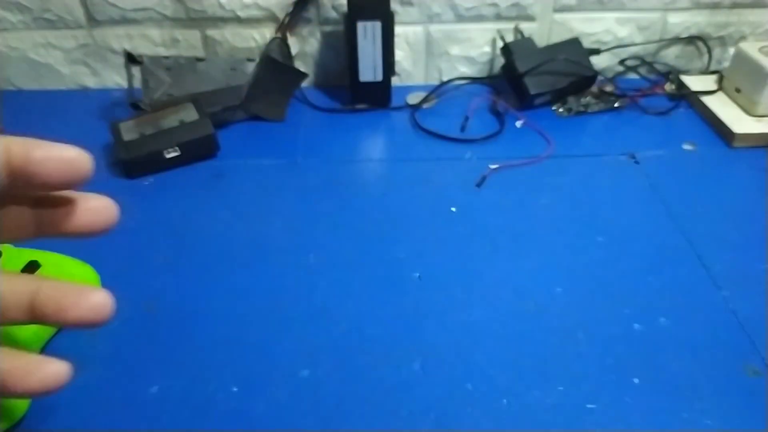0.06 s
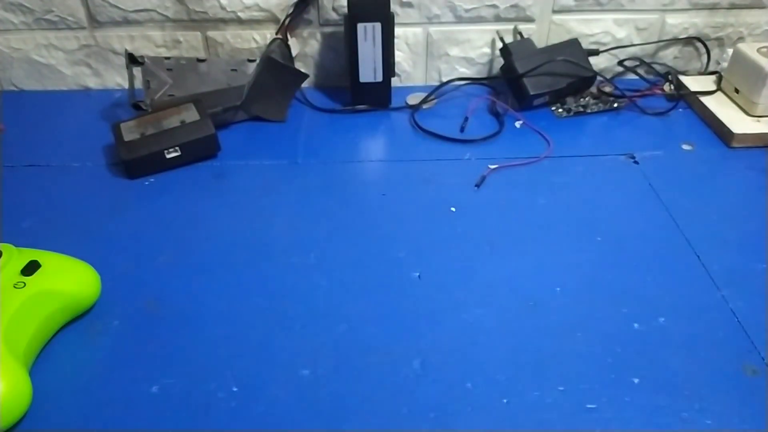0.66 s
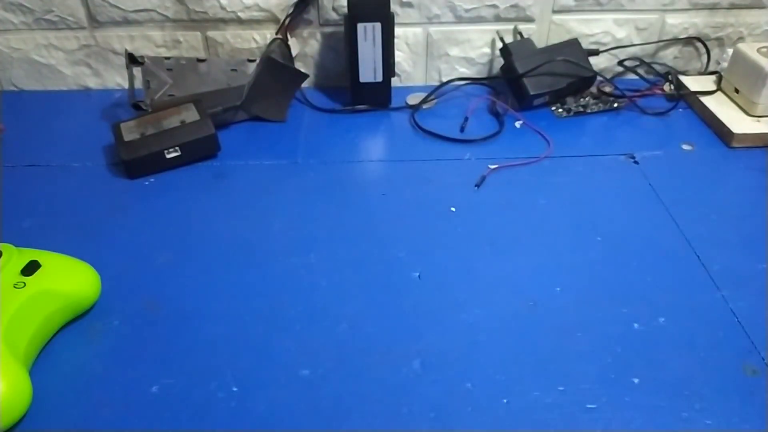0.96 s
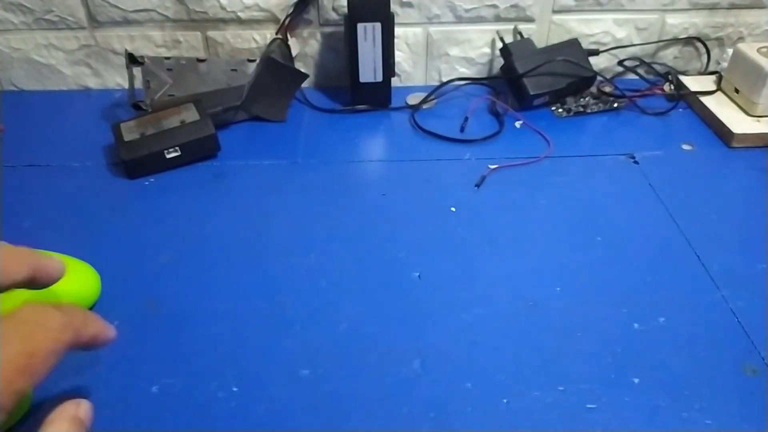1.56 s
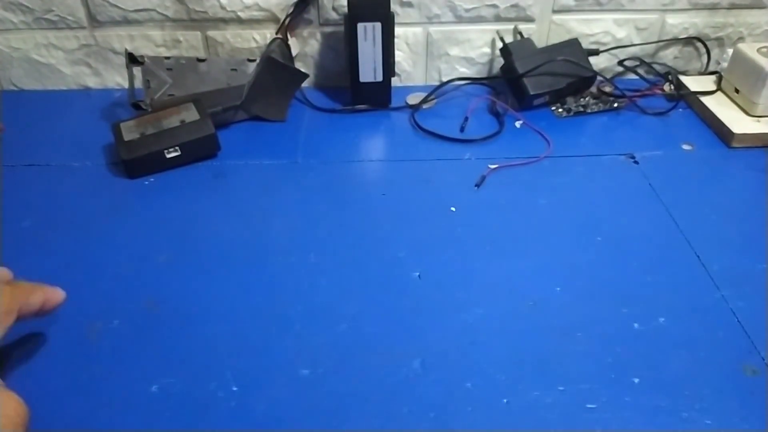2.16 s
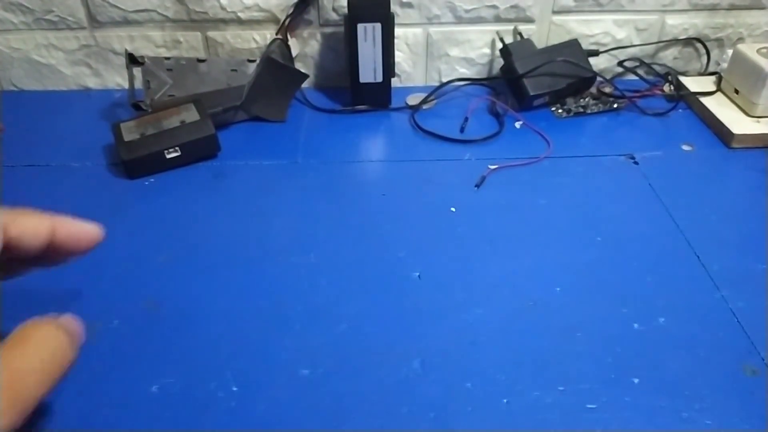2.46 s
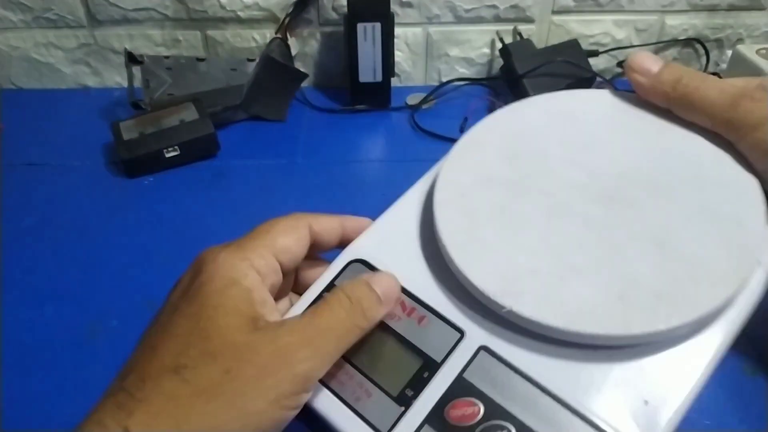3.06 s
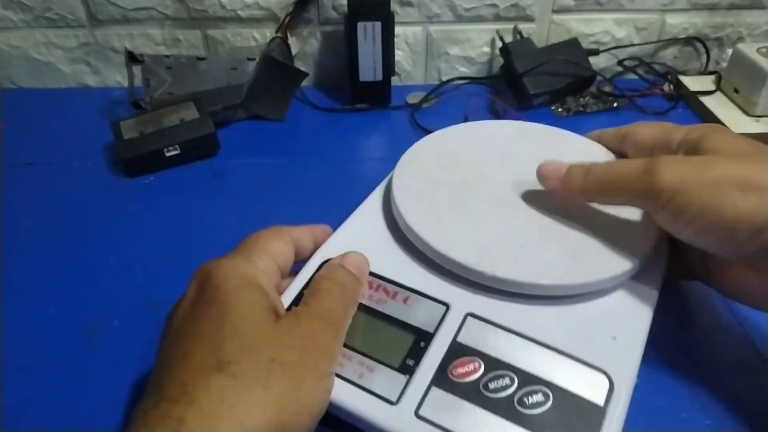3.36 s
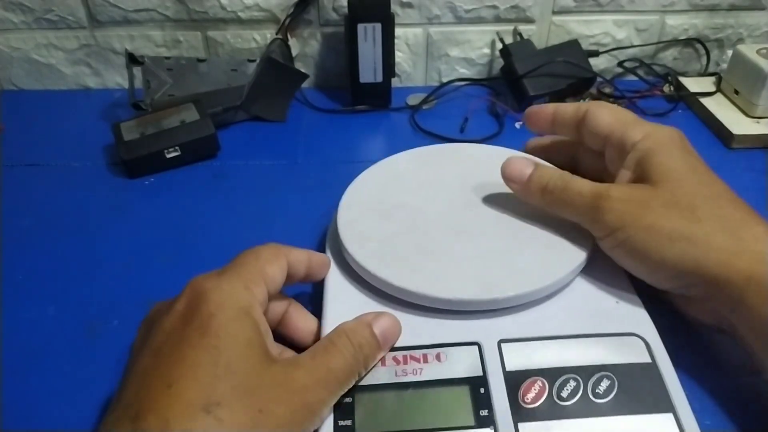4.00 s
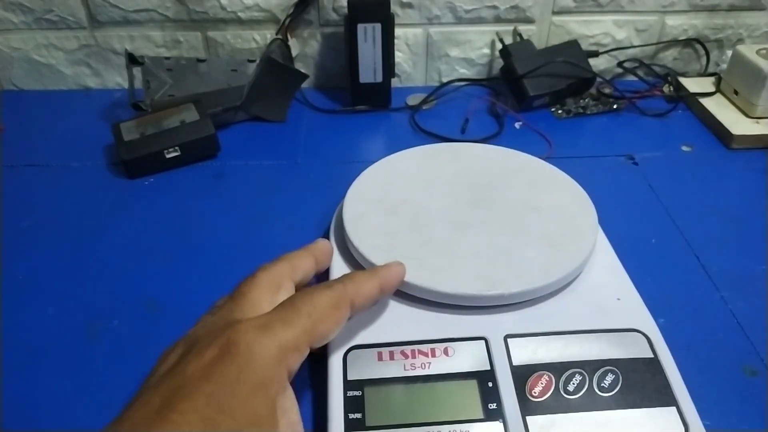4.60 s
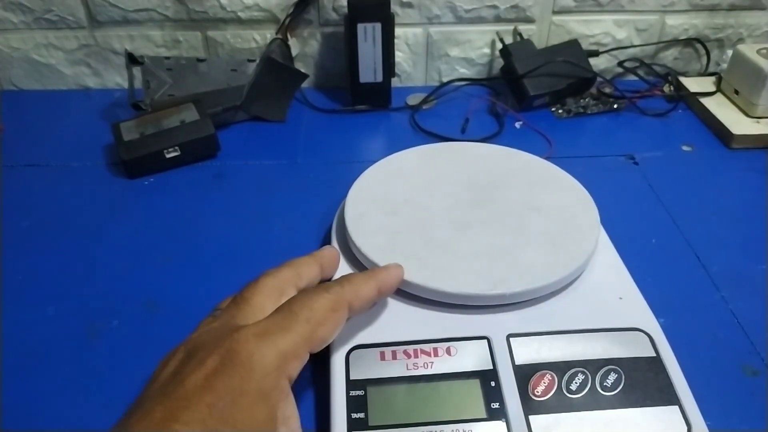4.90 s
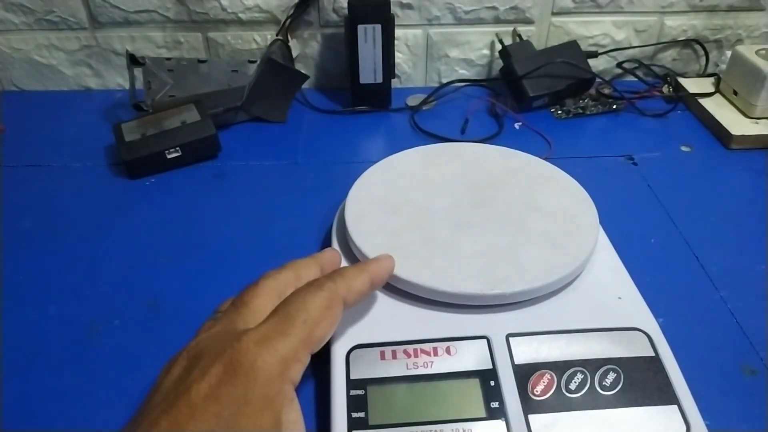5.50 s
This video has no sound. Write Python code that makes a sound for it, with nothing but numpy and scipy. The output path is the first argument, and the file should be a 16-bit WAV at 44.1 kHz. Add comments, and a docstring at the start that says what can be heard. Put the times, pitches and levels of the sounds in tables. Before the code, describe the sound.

On a wooden tabletop in a small room, hands shove things aside and set them down with light knocks, then drag a game controller away. Close to the microphone, fingers grip a hollow plastic kitchen scale, skin squealing thinly on it. The scale rocks down onto its feet with a cluster of knocks and is nudged into place. A hand strokes the casing softly, and one last faint knock comes from the side.

```python
"""A wooden tabletop in a small room, on a mono microphone close to a hollow plastic kitchen scale.
Farther off, hands shove things aside and set them down; near 1.8 s a game controller is dragged away.
From 2.3 s, close up, fingers grip the scale and pick it up, skin squealing thinly on the plastic.
Around 3.5 s it rocks down onto its feet and is nudged into place; a hand strokes the casing and settles.
One last thing is set down at the side. Knocks ring object and table; rubs are surface grains catching."""
import sys
import numpy as np
from scipy import signal
from scipy.fft import rfft, irfft, next_fast_len
from scipy.io import wavfile
from scipy.ndimage import uniform_filter1d, map_coordinates

SR = 44100
rng = np.random.default_rng(int(sys.argv[2]) if len(sys.argv) > 2 else 0)


def to_wav(s):
    """Save 16-bit WAV."""
    ch = np.atleast_2d(s).T  # columns
    pcm = np.round(np.clip(ch, -1, 1) * 32767)  # PCM
    wavfile.write(sys.argv[1], SR, pcm.astype(np.int16))


N = 244504

# Levels are relative: each source adds its own gain. A ring factor multiplies the t60 of the modes.
# Strokes, one table per pair of surfaces: t/s, rise/s, hold/s, t60/s, body level/dB, hiss level/dB
SHOVE_STROKES = [(0, 0.12, .005, 0.19, -69, -79), (.338, 0.026, 0.033, 0.27, -56.5, -64),
                 (.375, 0.081, .004, 0.35, -43.5, -48.5)]
SLIDE_STROKES = [(.632, 0.0069, 0.11, .5, -47, -51.5), (.72, 0.074, 0.06, .85, -50.5, -45),
                 (.88, 0.048, 0.0043, .65, -46, -51.5), (1.15, 0.033, 0.054, .9, -80, -75),
                 (5.458, 0.0057, 0.12, .3, -66, -68.5), (5.48, 0.038, .04, .3, -50.5, -69)]
DRAG_STROKES = [(1.758, 0.015, .03, .4, -58.5, -56), (1.8, 0.088, .01, 0.66, -52, -46.5),
                (1.918, 0.055, 0.0067, 0.47, -46, -50), (2.115, 0.024, 0.0076, 0.32, -60.5, -54.5),
                (2.22, .03, 0.0062, 0.2, -60.5, -63)]
GRIP_STROKES = [(2.396, 0.0035, 0.16, 0.37, -113, -55), (2.535, 0.0091, 0.0093, 0.57, -64, -43),
                (2.58, .04, 0.27, 0.17, -69, -60.5), (2.8, 0.037, 0.0067, 0.57, -61, -60),
                (2.925, 0.013, 0.0051, 0.24, -56, -59.5), (2.988, 0.0053, 0.0085, 0.31, -58, -59.5)]
NUDGE_STROKES = [(3.03, 0.017, 0.033, 1, -62.5, -55.5), (3.17, 0.098, 0.0087, 0.19, -45, -52.5),
                 (3.278, .06, 0.0517, 1, -61, -55), (3.46, 0.07, 0.032, 0.48, -43.5, -60.5),
                 (3.661, 0.3, 0.05, 0.93, -50, -50), (4.2, 0.0327, .01, 0.9, -72, -59)]
CASING_STROKES = [(4.3, 0.095, .01, .5, -73.5, -52.5), (4.41, 0.051, 0.02, 0.56, -59.5, -47),
                  (4.6, 0.06, 0.021, 0.25, -68.5, -58.5), (4.803, 0.0058, 0.046, 0.12, -77.5, -69),
                  (4.9, 0.068, 0.03, 0.17, -75.5, -107)]
# Spectrum of each pair of rubbing surfaces: f/Hz, level/dB
SHOVE_TONE = [(150, -24), (400, -22), (580, -9.5), (850, -4.5), (1060, -0.5), (1300, -8.5), (2500, -4),
              (4300, -20), (6200, -18), (8500, -30), (10000, -36.5), (15500, -30.5)]
SLIDE_TONE = [(88, -36), (150, 4.5), (352, -6.5), (404, -1), (445, -11.5), (500, -4), (618, -8.5),
              (796, -7.5), (912, -5), (1150, -2.5), (1700, -7), (2270, -6.5), (3040, -11.5), (6600, -16),
              (15500, -28)]
DRAG_TONE = [(150, 8.5), (400, -9.5), (720, 0.5), (950, -2.5), (1120, -6), (1600, -5), (2700, 5),
             (3400, -8), (3900, -8), (4500, -22.5), (8600, -15), (10300, -26), (15500, -29)]
GRIP_TONE = [(250, -22), (600, 16), (1100, 6), (1600, 3), (3300, -4.5), (4400, -23), (5800, -6.5),
             (7200, -9), (9500, -10.5), (11500, -16), (15500, -11.5)]
NUDGE_TONE = [(180, -4.5), (420, -14), (580, -2), (760, -7.5), (900, -10), (1200, -11), (1600, -11.5),
              (2600, -9), (4200, -11), (6000, -8.5), (8200, -4), (9800, -16.5), (15500, -16.5)]
CASING_TONE = [(250, -42), (550, -11), (1200, -15.5), (1700, -6.5), (2400, 1), (4000, -4.5), (6000, -7.5),
               (8200, 1), (10000, -6), (13500, -5.5), (15500, -6)]
# Hush of the room: f/Hz, level/dB
HUSH_TONE = [(25, -0.5), (60, -2), (150, -17.5), (500, -24.5), (1200, -32.5), (2400, -31.5), (3300, -33.5),
             (5000, -29), (7500, -32), (11000, -41), (14000, -22.5)]
# Spells of faint sizzle: t/s, hold/s, level/dB, favoured f/Hz
SIZZLE_SPELLS = [(0, .13, -64.5, 2450), (0.216, 0.33, -74, 2430), (1.13, 0.26, -67.5, 5920),
                 (1.363, 0.034, -66, 3310), (1.44, .005, -74.5, 8050), (1.652, 0.13, -69.5, 5520),
                 (4.715, 0.037, -66, 3700), (4.806, .06, -63, 2110), (4.934, 0.018, -67.5, 1986),
                 (5.047, 0.056, -84, 2955), (5.214, .06, -72, 2808), (5.367, 0.13, -72.5, 3880)]
# Resonances of the sizzle: f/Hz, width/Hz, level/dB
SIZZLE_PEAKS = [(1790, 180, -17), (2165, 590, 5.5), (2533, 170, 5.5), (2956, 120, 9), (3380, 75, -23),
                (3980, 130, 7.5), (6390, 200, -2), (7200, 100, -6), (7800, 930, -33), (8100, 900, 4.5)]
# Hands lean on the tabletop: t/s, rise/s, hold/s, t60/s, level/dB
LEANS = [(.74, 0.028, 0.072, 0.49, -56.5), (1.21, 0.031, 0.21, 1.6, -65.5), (2.92, 0.049, 0.14, 2.1, -60.5),
         (3.7, 0.087, 0.21, 1.46, -57.5), (4.5, 0.082, 0.19, 1.8, -79.5)]
# Spectrum of the shaking tabletop: f/Hz, level/dB
JUDDER_TONE = [(22, -10.5), (45, -8), (62, -2), (85, 3), (105, -9), (133, -1), (180, -21), (300, -16),
               (600, -59)]
# Things set down at the side, and the scale bumping fingers and table:
# t/s, thud level/dB, body level/dB, clack level/dB, click level/dB, ring factor, favoured f/Hz
SIDE_KNOCKS = [(.637, -54, -49, -39.5, -49.5, 0.49, 450), (.642, -35, -31, -38.5, -40.5, 0.52, 443),
               (.701, -57, -27, -34, -36.5, 0.73, 700), (.707, -33.5, -32.5, -20.5, -49.5, 0.32, 1140),
               (.731, -63, -32.5, -53, -61.5, 0.4, 810), (.955, -60, -37, -49, -54.5, 0.94, 1030),
               (1.061, -73, -39.5, -41, -48, .8, 440), (1.077, -73, -37, -49.5, -58.5, 0.21, 547),
               (1.182, -76, -47.5, -51, -75, 0.7, 594), (1.812, -32.5, -50, -33, -37, 0.54, 1116),
               (1.964, -40.5, -46, -52, -65, 1, 493), (1.994, -39.5, -63, -64, -53.5, 1, 269),
               (2.008, -39, -66, -38.5, -35, 0.57, 269), (2.128, -56.5, -52, -59.5, -43.5, 1, 1089),
               (5.486, -50.5, -59.5, -53.5, -55.5, 1, 257.5)]
SCALE_KNOCKS = [(3.0945, -58, -38, -46, -54.5, 0.42, 720), (3.171, -56, -34.5, -43.5, -42, 0.58, 640),
                (3.216, -41, -36.5, -32, -33.5, 0.24, 751), (3.246, -46.5, -44, -42, -57, 0.57, 743),
                (3.4515, -31, -24.5, -26.5, -34.5, 0.61, 786), (3.466, -37.5, -21, -28, -40.5, 0.76, 730),
                (3.49, -38.5, -34.5, -38.5, -60.5, 1, 580), (3.567, -36.5, -33.5, -45, -46.5, 0.3, 500),
                (3.585, -58, -23.5, -37.5, -47.5, 0.73, 730), (3.598, -61, -27.5, -48, -59, 0.71, 674),
                (3.954, -37, -30, -40.5, -36.5, 0.36, 272), (3.98, -58, -29, -32.5, -41, 0.57, 885),
                (4.205, -49, -42.5, -39.5, -49.5, 0.39, 596), (4.476, -71, -61, -44, -65, 0.94, 1230)]
# Modes of the tabletop, the things at the side and the scale's shell: f/Hz, level/dB, t60/s
TABLE_MODES = [(89, -3.5, 0.16), (132.3, 0, 0.25), (144, -9, 0.066), (250, -9.5, .08)]
CLUTTER_MODES = [(250, -2, 0.061), (402, -5.5, 0.11), (511, -2.5, 0.048), (734, -4.5, 0.062),
                 (848, -4, 0.061), (1120, -25.5, .1), (1112, 0.5, 0.055), (1296, -10, 0.069),
                 (1330, -14, 0.061), (1400, -11, 0.055), (1718, -12, .12), (1850, -16.5, .12)]
SHELL_MODES = [(322.4, -3.5, 0.084), (400, -8.5, 0.065), (485, -5.5, 0.069), (576.7, -8, 0.21),
               (623, -7.5, .08), (688, -7, 0.14), (738, 2, 0.05), (860, -16.5, 0.034), (980, -17.5, .04),
               (1000, -9, 0.097), (1109, -10.5, 0.085), (1365, -20, 0.033), (1590, -30, 0.029),
               (1811, -11.5, 0.078)]
# Crowded upper modes (clack) and hard contact (click): f/Hz, level/dB
CLACK_TONE = [(500, -25.5), (1200, 1.5), (1800, -2.5), (2800, -9.5), (3800, -14), (5000, -27.5),
              (9000, -37)]
CLICK_TONE = [(2000, -35.5), (4000, -10), (6000, 0.5), (8300, 1), (10000, -18), (15500, -2)]
# Reverberation of the small room: f/Hz, t60/s
ROOM_DECAY = [(100, 0.16), (600, 0.33), (2000, 0.31), (8000, 0.099), (15000, 0.22)]
# Fingernails and creaking plastic, and a touch on a small hollow piece: t/s, level/dB, f/Hz
NAIL_TICKS = [(1.205, -40.5, 3640), (1.813, -22.5, 3570), (2.5456, -25.5, 1816), (2.897, -47.5, 4500),
              (2.931, -35, 2300), (2.939, -37, 4600), (2.994, -35.5, 5100), (4.628, -40, 4670),
              (4.807, -41, 7650), (4.9435, -57.5, 1980), (5.459, -38, 2230)]
PLINK = [(1.694, -50, 1530)]
# Padded blows on the tabletop: t/s, level/dB
THUMPS = [(1.263, -48), (1.434, -44), (1.77, -33), (1.782, -37), (1.897, -31), (2.993, -43.5),
          (4.679, -52.5)]
# Soft fingertips on hollow plastic: t/s, level/dB, favoured f/Hz, ring factor
FINGER_TAPS = [(1.763, -41, 743, 0.45), (2.547, -34, 723, 0.39), (2.556, -35.5, 1144, 0.35),
               (2.731, -42.5, 926, 0.44), (2.796, -34.5, 1220, 0.24), (2.808, -38.5, 760, 0.66),
               (3.109, -33.5, 614, 0.73), (3.126, -39, 690, 0.41), (3.183, -43, 590, 0.76),
               (3.207, -33.5, 760, 0.76), (4.229, -38.5, 500, 0.59), (4.678, -48, 750, 0.94)]
# Skin slips over plastic: t/s, rise/s, hold/s, t60/s, squeal level/dB, squeak level/dB
SKIN_SLIPS = [(2.25, .04, .1, .4, -78, -92), (2.396, .006, .1, .4, -66, -65),
              (2.47, .06, .04, .35, -56, -56), (2.58, .04, .12, .4, -60, -55),
              (2.75, .015, .07, .35, -60, -57)]
# Resonances of the thin squeal and of the shrill squeak above it: f/Hz, width/Hz, level/dB
SQUEAL_PEAKS = [(3770, 55, -14.5), (3933, 85, -9), (4340, 260, -22), (5290, 460, -26), (5900, 780, -29)]
SQUEAK_PEAKS = [(9350, 45, 0), (9990, 100, -5)]
# The palm settles against the casing: t/s, rise/s, hold/s, t60/s, level/dB
PALM_PRESSES = [(4.9, 0.017, 0.081, .3, -84), (4.98, .04, 0.038, .22, -70)]
# Spectrum of the casing under the palm: f/Hz, level/dB
PALM_TONE = [(120, -10.5), (230, -0.5), (310, 7.5), (450, -31.5), (900, -58)]

MIC_TOP_HZ = 15750


def amp(db):
    """Decibels to gain."""
    return 10 ** (np.asarray(db) / 20)


def unit(x):
    """Scale to rms 1."""
    return x / np.sqrt(np.mean(x ** 2) + 1e-20)


def crest(x):
    """Scale so that the loudest 6 ms have rms 1."""
    return x / np.sqrt(uniform_filter1d(x ** 2, 260).max() + 1e-20)


def along(points, hz):
    """Read (f/Hz, value) points on a log frequency axis."""
    freqs, values = np.transpose(points)
    return np.interp(np.log(hz + 1), np.log(freqs + 1), values)


def filtered(x, response):
    """Filter x by a gain given as a function of frequency."""
    size = next_fast_len(len(x) + 8192, real=True)
    return irfft(rfft(x, size) * response(np.fft.rfftfreq(size, 1 / SR)), size)[:len(x)]


def coloured(x, tone):
    """Shape x with a spectrum, at rms 1."""
    return unit(filtered(x, lambda hz: amp(along(tone, hz))))


def wobble(rate):
    """A random curve through rate knots a second."""
    return map_coordinates(rng.standard_normal(4096), [np.arange(N) * rate / SR], order=1, mode="wrap")


def add(track, start, sound):
    """Mix a sound into a track from start, in seconds."""
    span = track[max(round(start * SR), 0):][:len(sound)]
    span += sound[:len(span)]


def swells(rows):
    """Strokes that rise, hold and die away: one gain curve for each level column."""
    t, power = np.arange(N) / SR, 0
    for start, rise, hold, t60, *db in rows:
        rising = np.clip((t - start) / max(rise, .002), 0, 1)
        falling = amp(-60 * np.clip((t - start - rise - hold) / t60, 0, 2))
        power = power + np.outer(amp(db), rising * falling) ** 2
    return np.sqrt(power)


def ripple(hz):
    """The crowded upper resonances of a sliding thing: blunt tops with notches between them."""
    uneven = np.minimum(map_coordinates(rng.standard_normal(256), [hz / 130]), .7)
    return amp(3 * np.clip(hz / 2000, 0, 1) * uneven)


def rub(strokes, tone, level_db, rasp_db, grit, chatter_db):
    """Surface grains catch and let go: a dense patter with low body, high hiss and a rasp between."""
    catches = rng.standard_normal(N) * (rng.random(N) < 700 / SR)  # about 700 a second
    friction = (rng.standard_normal(N) + grit * unit(catches)) * amp(chatter_db * wobble(110))
    size = next_fast_len(N, real=True)
    hz = np.fft.rfftfreq(size, 1 / SR)
    spectrum = rfft(friction, size) * amp(along(tone, hz)) * ripple(hz) * (hz < MIC_TOP_HZ)
    above = lambda edge_hz: 1 - 1 / (1 + (hz / edge_hz) ** 8)
    bands = [above(200) - above(1500), above(1500) - above(4500), above(4500)]
    low, middle, high = [unit(irfft(spectrum * band, size)[:N]) for band in bands]
    body, hiss = swells(strokes)
    rasp = amp(rasp_db) * np.sqrt(body * hiss)
    return amp(level_db) * (body * low + rasp * middle + hiss * high)


def rubs():
    """Things slide over the table, then hands slide over the scale."""
    shove = rub(SHOVE_STROKES, SHOVE_TONE, level_db=0.5, rasp_db=-8.5, grit=0.54, chatter_db=1.5)
    slide = rub(SLIDE_STROKES, SLIDE_TONE, level_db=-1.5, rasp_db=-2, grit=0.067, chatter_db=1.54)
    drag = rub(DRAG_STROKES, DRAG_TONE, level_db=0.5, rasp_db=-3.5, grit=0.16, chatter_db=2)
    grip = rub(GRIP_STROKES, GRIP_TONE, level_db=-3.5, rasp_db=-0.5, grit=0.12, chatter_db=1)
    nudge = rub(NUDGE_STROKES, NUDGE_TONE, level_db=-1, rasp_db=-5.5, grit=0.35, chatter_db=2)
    casing = rub(CASING_STROKES, CASING_TONE, level_db=-1.5, rasp_db=-3.5, grit=0.14, chatter_db=0.5)
    return shove + slide + drag + grip + nudge + casing


def hush():
    """Room tone: a steady, mostly low noise under everything."""
    return amp(-77) * coloured(rng.standard_normal(N), HUSH_TONE)


def whistling(peaks):
    """Noise of rms 1 in a few narrow resonances with dark valleys between them."""
    response = lambda f: sum(amp(db) / (1 + (2 * (f - hz) / width) ** 2) for hz, width, db in peaks)
    return unit(filtered(rng.standard_normal(N), response))


def sizzle(level_db, drift, focus_db):
    """Faint sizzle; each spell shifts the peaks, which lose focus_db an octave from its favoured pitch."""
    out = np.zeros(N)
    for start, hold, db, favoured_hz in SIZZLE_SPELLS:
        peaks = []
        for hz, width, peak_db in SIZZLE_PEAKS:
            shifted_hz = hz * (1 + drift * rng.standard_normal())
            peaks.append((shifted_hz, width, peak_db - focus_db * abs(np.log2(hz / favoured_hz))))
        out += swells([(start, 0.0033, hold, 0.31, db + level_db)])[0] * whistling(peaks)
    return out


def rumble(force, tone, level_db, lumps_db):
    """A panel shakes unevenly under whatever moves on it."""
    shake = coloured(rng.standard_normal(N) * amp(lumps_db * wobble(25)), tone)
    return amp(level_db) * force * shake


def judder():
    """The tabletop shakes under sliding things and leaning hands."""
    sliding = amp(-9.5) * swells(SLIDE_STROKES + DRAG_STROKES + NUDGE_STROKES)[0]
    force = np.hypot(swells(LEANS)[0], sliding)
    return rumble(force, JUDDER_TONE, level_db=1.5, lumps_db=3.5)


def struck(modes, favoured_hz, focus_db):
    """The struck spot feeds modes near favoured_hz; the others lose focus_db per octave."""
    return [(hz, db - focus_db * abs(np.log2(hz / favoured_hz)), t60) for hz, db, t60 in modes]


def ring(modes, t, ring_factor, attack, scatter_db):
    """Damped modes, at new strengths and signs for each blow."""
    hz, db, t60 = np.transpose(modes)[:, :, None]
    strength = amp(db + scatter_db * rng.standard_normal(hz.shape)) * rng.choice([-1, 1], hz.shape)
    waves = strength * amp(-60 * t / (t60 * ring_factor)) * np.sin(2 * np.pi * hz * t)
    return crest(waves.sum(0) * (1 - np.exp(-t / attack)))


def burst(tone, t, t60, attack):
    """Modes too crowded to tell apart, dying together."""
    noise = coloured(rng.standard_normal(len(t)), tone)
    return crest(noise * amp(-60 * t / t60) * (1 - np.exp(-t / attack)))


def knocks(rows, modes, thud_db, body_db, clack_db, click_db, clack_t60, click_t60, attack, focus_db):
    """A blow thuds in the table, rings the object and clicks; the thing then rocks onto a second corner."""
    out, t = np.zeros(N), np.arange(SR // 3) / SR
    for start, thud, body, clack, click, ring_factor, favoured_hz in rows:
        fed_modes = struck(modes, favoured_hz, focus_db)
        for delay, ring_db, edge_db in [(0, 0, 0), (0.014, -9, -26.5)]:  # blow, soft rebound
            table = amp(thud + thud_db) * ring(TABLE_MODES, t, ring_factor, 0.0016, scatter_db=1.5)
            shell = amp(body + body_db) * ring(fed_modes, t, ring_factor, attack, scatter_db=2.5)
            edge = amp(clack + clack_db) * burst(CLACK_TONE, t, clack_t60 * ring_factor, attack)
            edge += amp(click + click_db) * burst(CLICK_TONE, t, click_t60, attack)
            add(out, start + delay, amp(ring_db) * (table + shell) + amp(edge_db) * edge)
    return out


def room(x, delay_s=.004):
    """The near walls answer, each frequency dying at its own speed."""
    hz, t, noise = signal.stft(rng.standard_normal(SR // 2), SR, nperseg=256)
    decay = amp(-60 * t / along(ROOM_DECAY, hz)[:, None])
    tail = signal.istft(noise * decay, SR, nperseg=256)[1]
    delayed = np.pad(x, (round(delay_s * SR), 0))
    return signal.fftconvolve(delayed, tail / np.linalg.norm(tail))[:N]


def ticks(rows, level_db, octaves, t60):
    """Tiny hard contacts, each bright around its own pitch."""
    out, t = np.zeros(N), np.arange(SR // 10) / SR
    envelope = amp(-60 * t / t60) * (1 - np.exp(-t / 0.00018))
    for start, db, pitch_hz in rows:
        band = lambda hz: 1 / (1 + (np.log2((hz + 1) / pitch_hz) / octaves) ** 2)
        noise = filtered(rng.standard_normal(len(t)), band)
        add(out, start, amp(db + level_db) * crest(noise * envelope))
    return out


def thumps(level_db):
    """Soft flesh on the tabletop wakes only its lowest modes."""
    out, t = np.zeros(N), np.arange(SR // 3) / SR
    for start, db in THUMPS:
        thud = ring(TABLE_MODES, t, ring_factor=0.94, attack=0.0074, scatter_db=6)
        add(out, start, amp(db + level_db) * thud)
    return out


def taps(level_db, attack, focus_db):
    """A fingertip gives a dull pat and rings only the shell modes that its spot favours."""
    out, t = np.zeros(N), np.arange(SR // 4) / SR
    for start, db, hz, ring_factor in FINGER_TAPS:
        pat_tone = [(hz / 2.2, -22), (hz, 0), (hz * 2, -12), (hz * 6, -45)]
        pat = amp(-4) * burst(pat_tone, t, t60=0.087, attack=attack)
        shell = ring(struck(SHELL_MODES, hz, focus_db), t, ring_factor, attack, scatter_db=2.5)
        add(out, start, amp(db + level_db) * (shell + pat))
    return out


def squeal(squeal_db, squeak_db):
    """Slipping skin feeds a lower and an upper group of resonances, each in fits and starts."""
    lower, upper = [gain * amp(2.5 * wobble(38)) for gain in swells(SKIN_SLIPS)]
    thin = amp(squeal_db) * lower * whistling(SQUEAL_PEAKS)
    shrill = amp(squeak_db) * upper * whistling(SQUEAK_PEAKS)
    return thin + shrill


def palm():
    """The casing rumbles softly as the palm settles against it."""
    return rumble(swells(PALM_PRESSES)[0], PALM_TONE, level_db=3.5, lumps_db=7.5)


def scene():
    """The scale is close to the microphone and dry; things at the side are farther off, with more room."""
    aside = knocks(SIDE_KNOCKS, CLUTTER_MODES, thud_db=-4, body_db=0.5, clack_db=-3, click_db=-10,
                   clack_t60=0.041, click_t60=0.06, attack=0.0012, focus_db=7.5)
    scale = knocks(SCALE_KNOCKS, SHELL_MODES, thud_db=2, body_db=-1, clack_db=-4, click_db=-3,
                   clack_t60=0.065, click_t60=0.02, attack=0.0015, focus_db=7)
    fingers = taps(level_db=-9, attack=0.003, focus_db=29)
    nails = ticks(NAIL_TICKS, level_db=-15, octaves=.9, t60=0.014)
    plink = ticks(PLINK, level_db=-5, octaves=0.033, t60=0.029)
    walls = room(amp(-2.5) * aside + amp(-12.5) * (scale + fingers) + amp(-4) * (nails + plink))
    table = thumps(level_db=-12) + judder()
    skin = squeal(squeal_db=2, squeak_db=-5) + palm()
    mono = aside + scale + fingers + nails + plink + walls + table + skin + rubs()
    mono += hush() + sizzle(level_db=-1.5, drift=0.057, focus_db=9)
    return np.array([mono, mono])


def record(dry):
    """The microphone keeps nothing above its band limit."""
    return np.array([filtered(channel, lambda hz: hz < MIC_TOP_HZ) for channel in dry])


dry = scene()
out = record(dry)
to_wav(out)
```